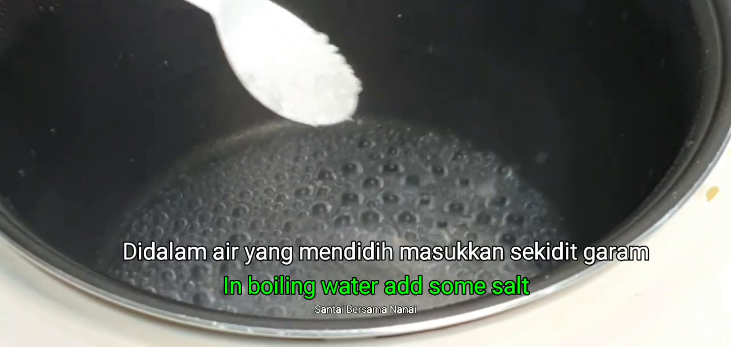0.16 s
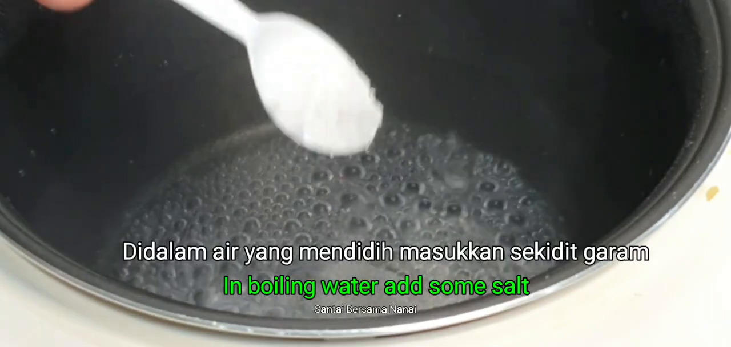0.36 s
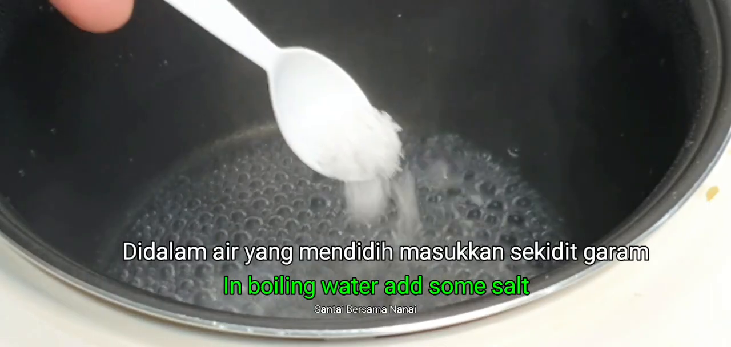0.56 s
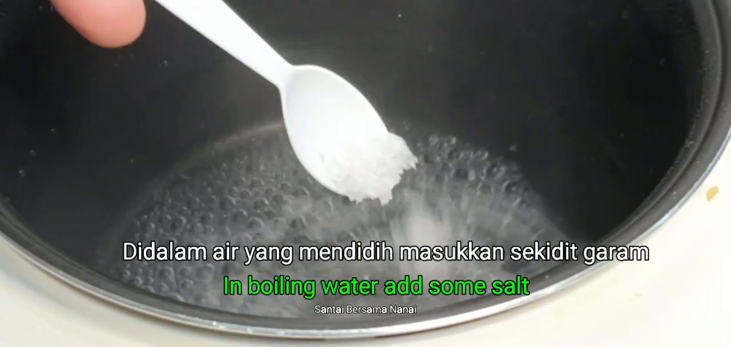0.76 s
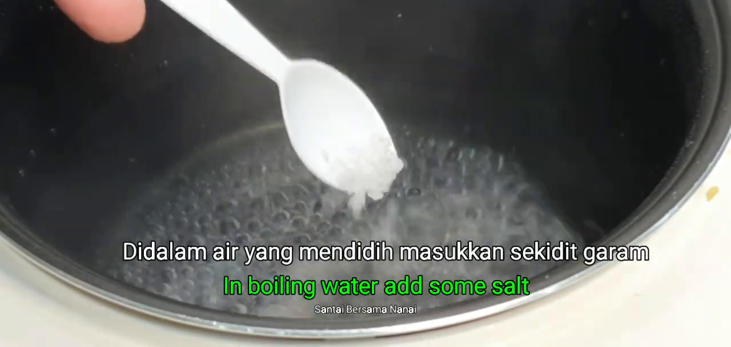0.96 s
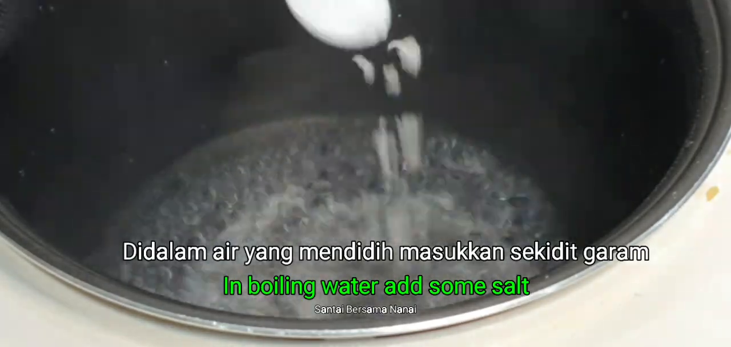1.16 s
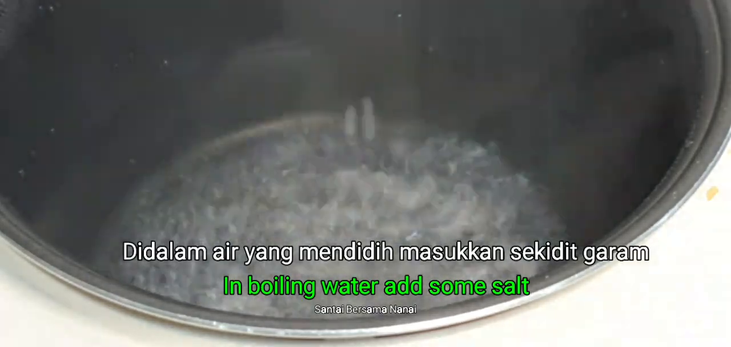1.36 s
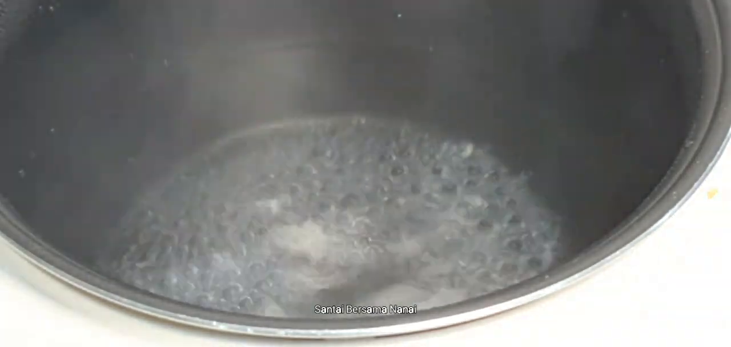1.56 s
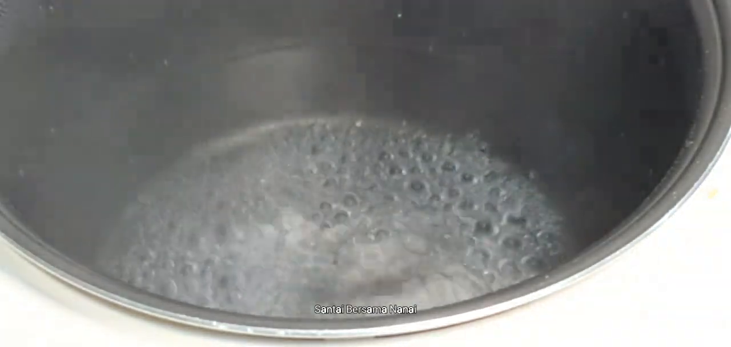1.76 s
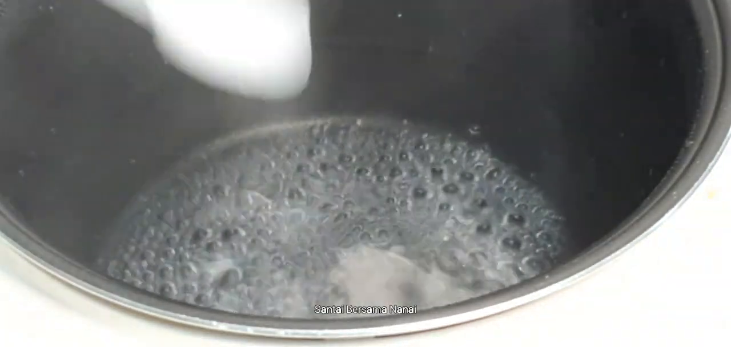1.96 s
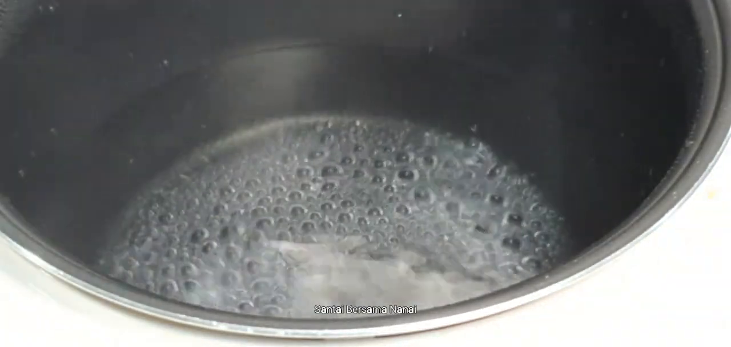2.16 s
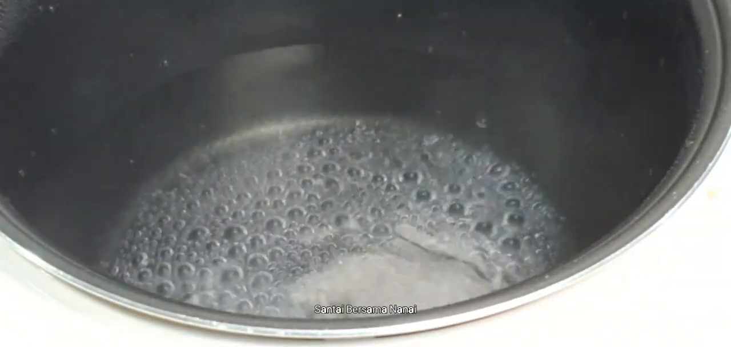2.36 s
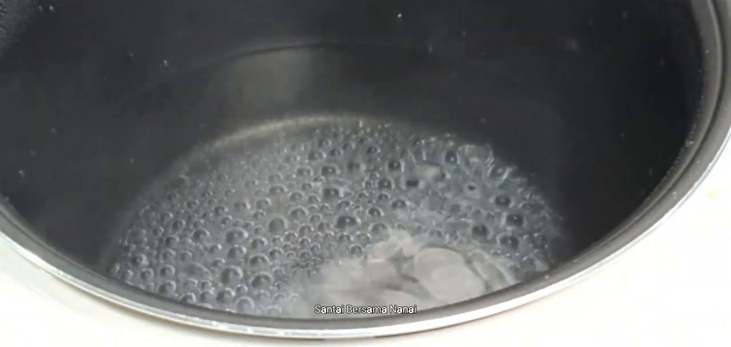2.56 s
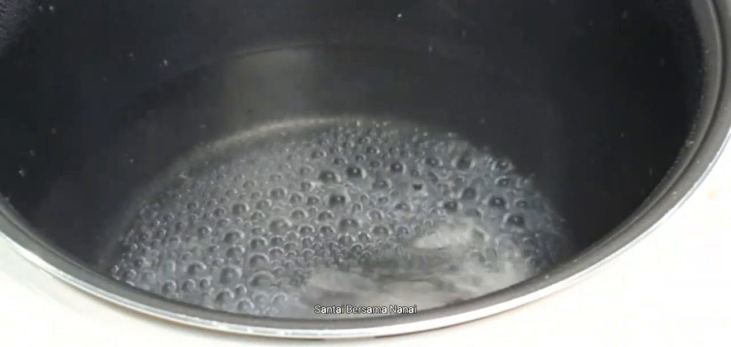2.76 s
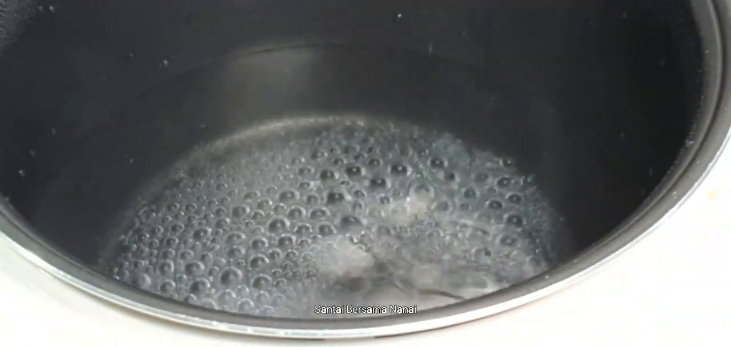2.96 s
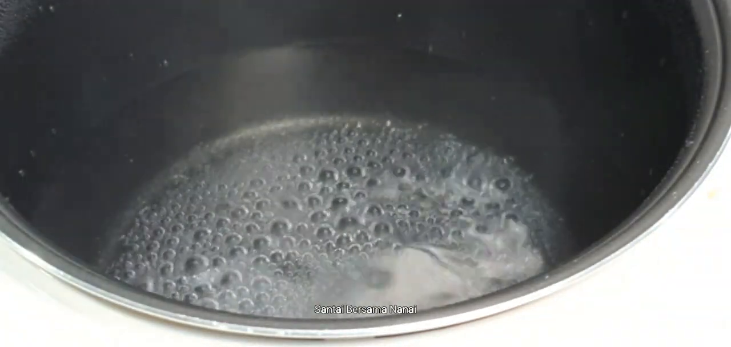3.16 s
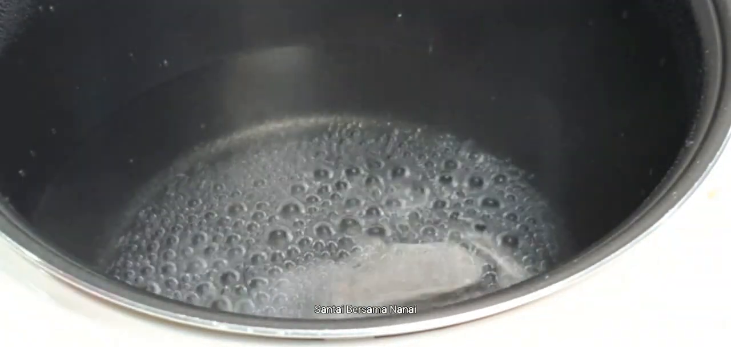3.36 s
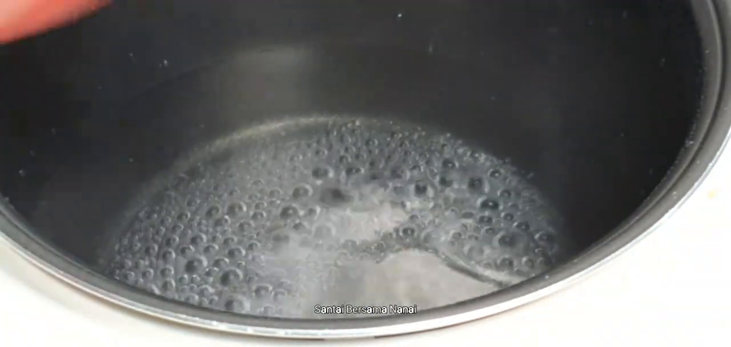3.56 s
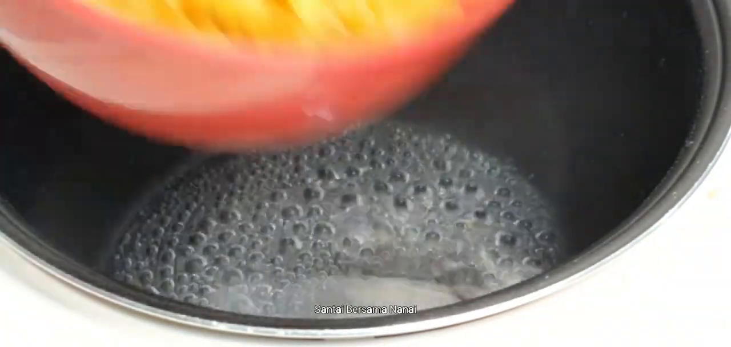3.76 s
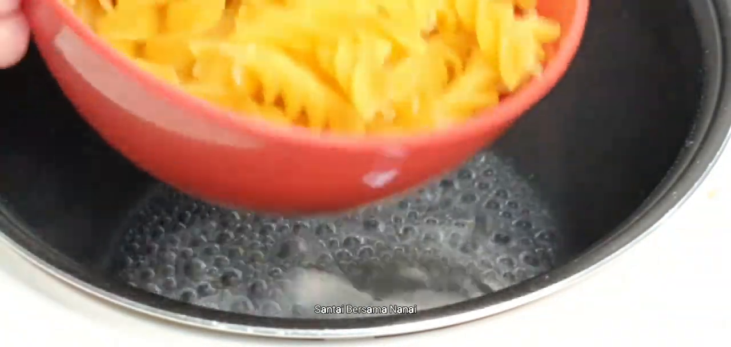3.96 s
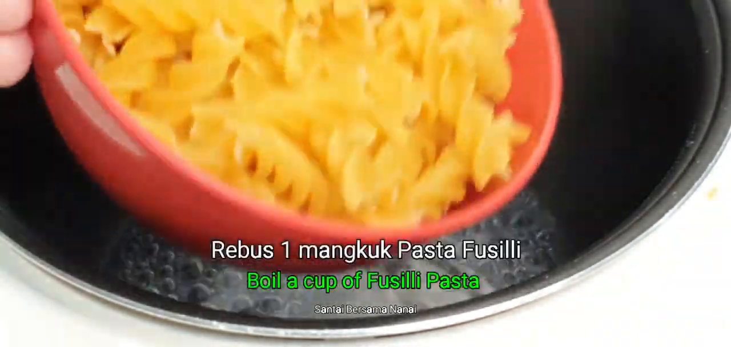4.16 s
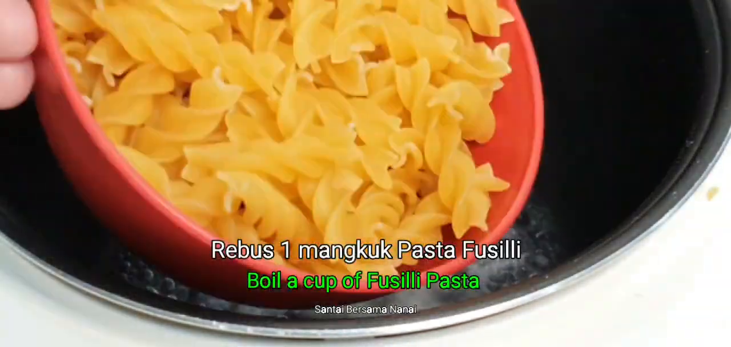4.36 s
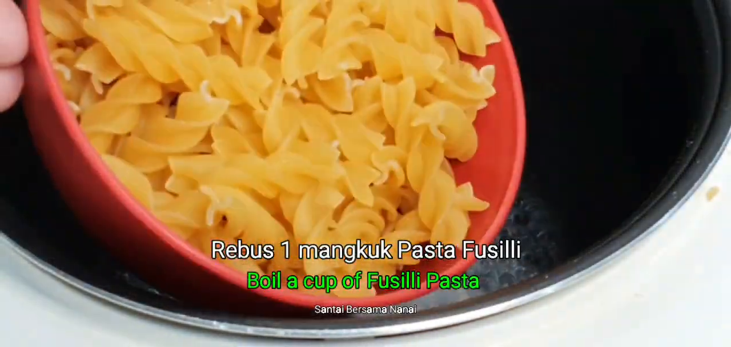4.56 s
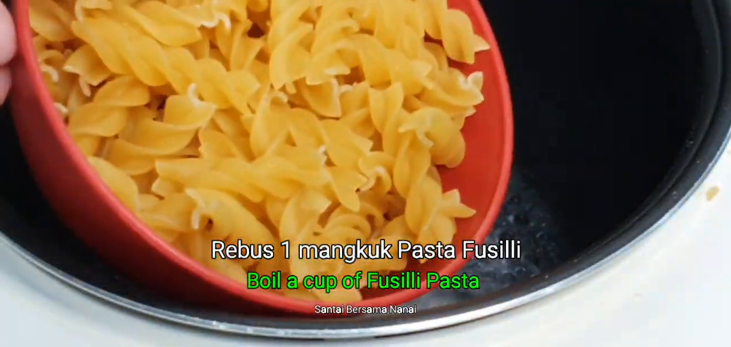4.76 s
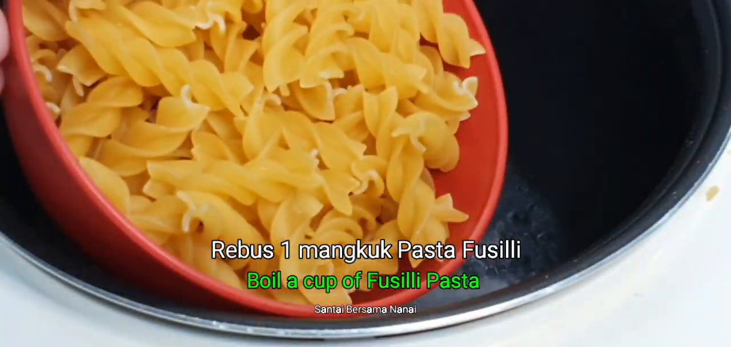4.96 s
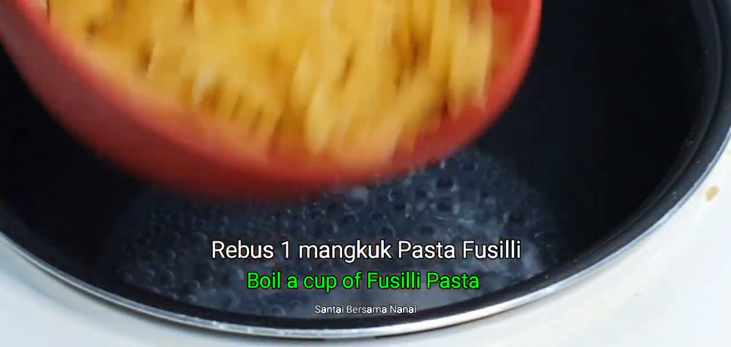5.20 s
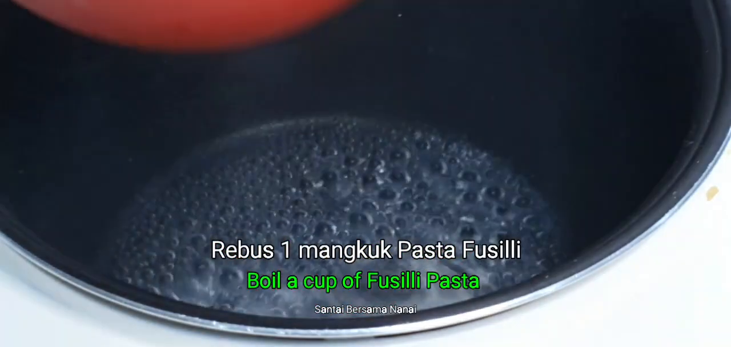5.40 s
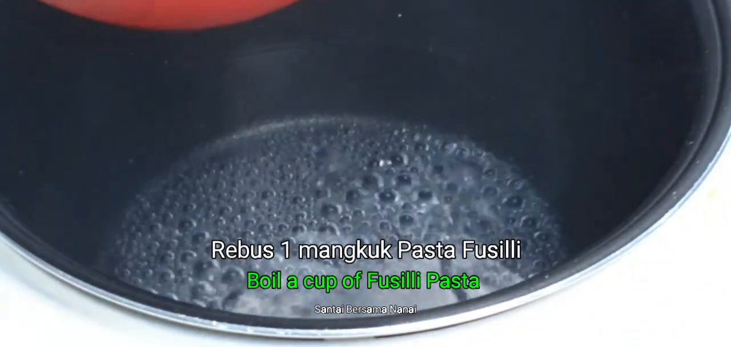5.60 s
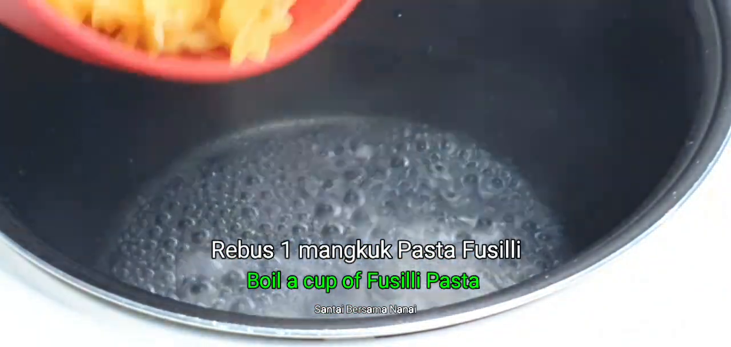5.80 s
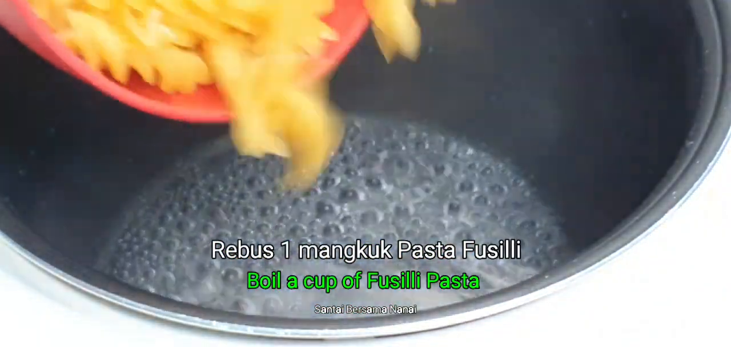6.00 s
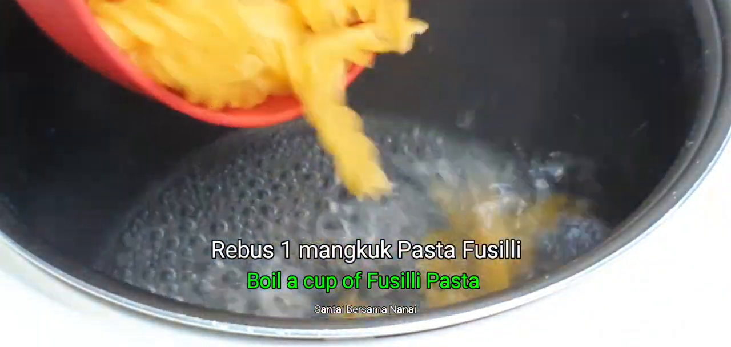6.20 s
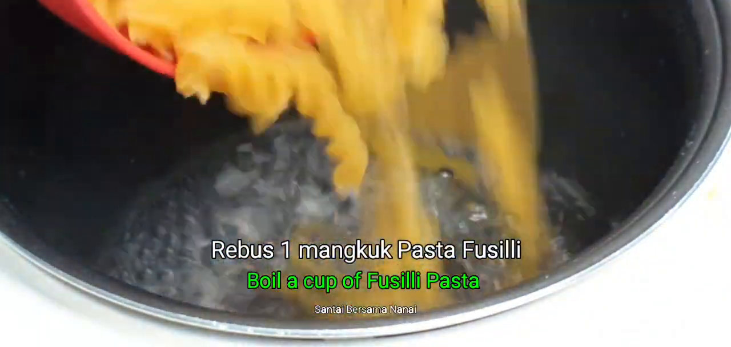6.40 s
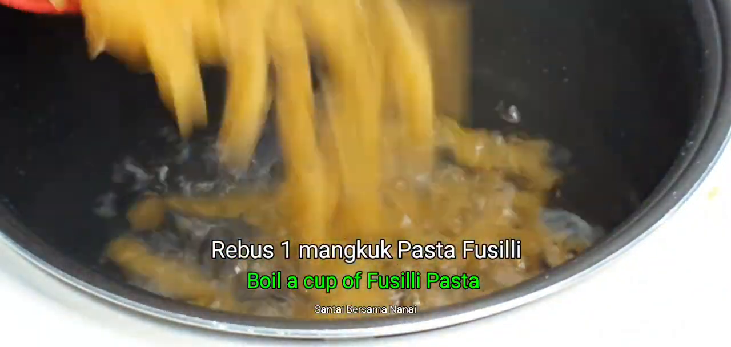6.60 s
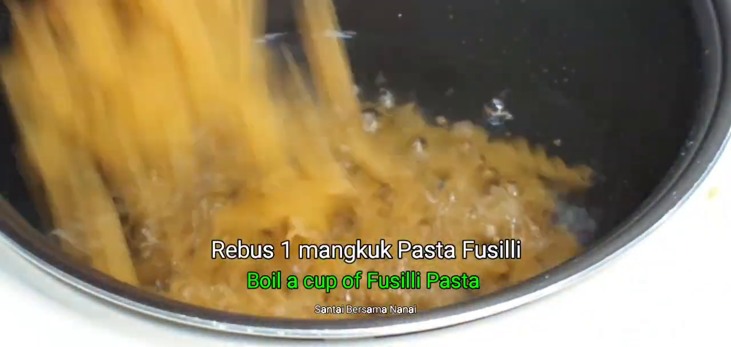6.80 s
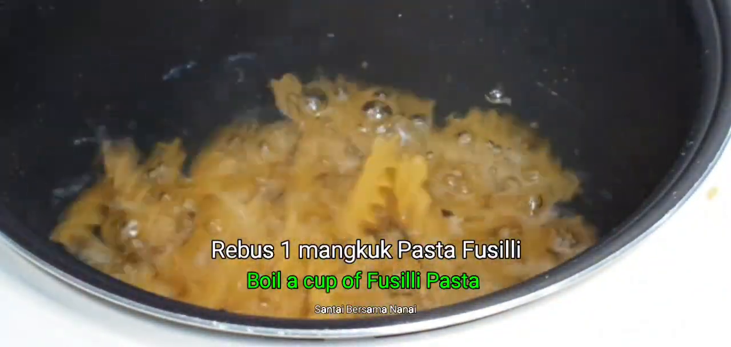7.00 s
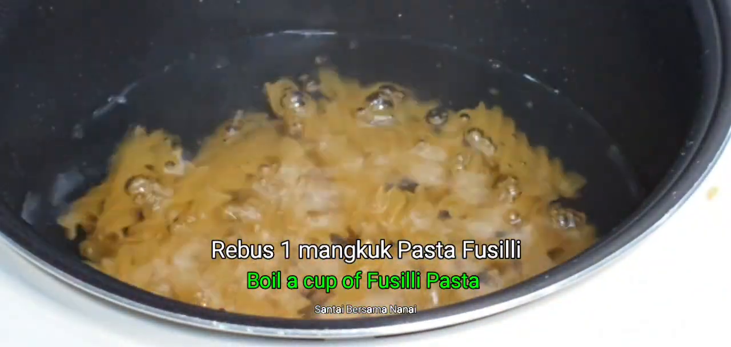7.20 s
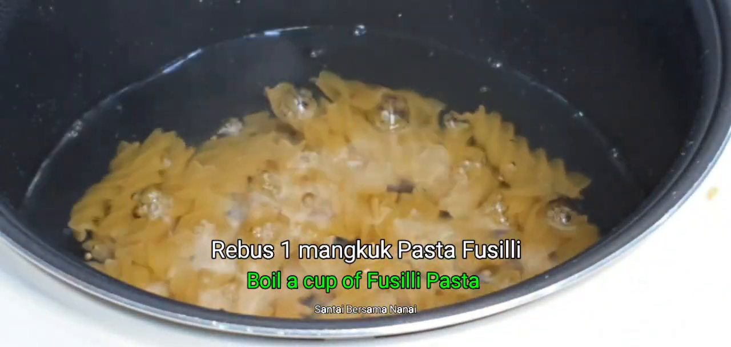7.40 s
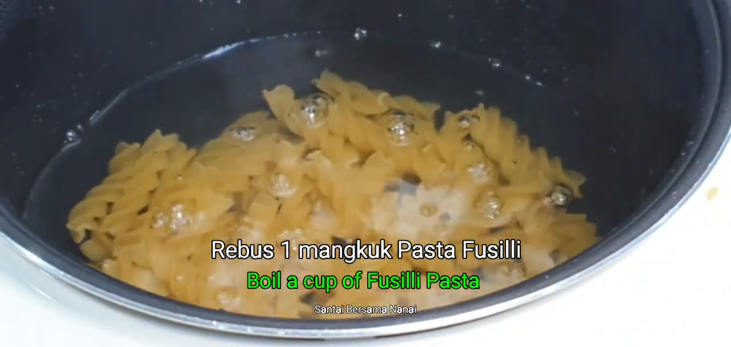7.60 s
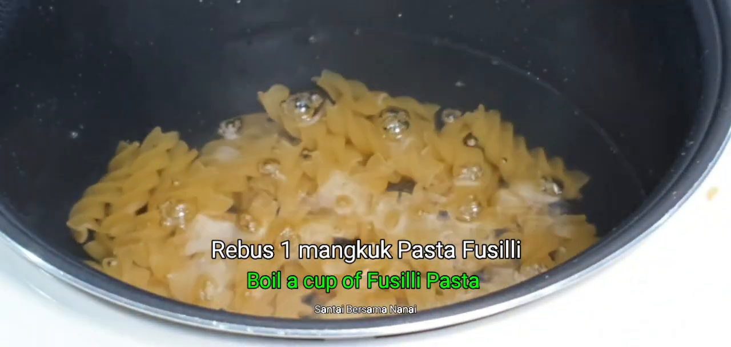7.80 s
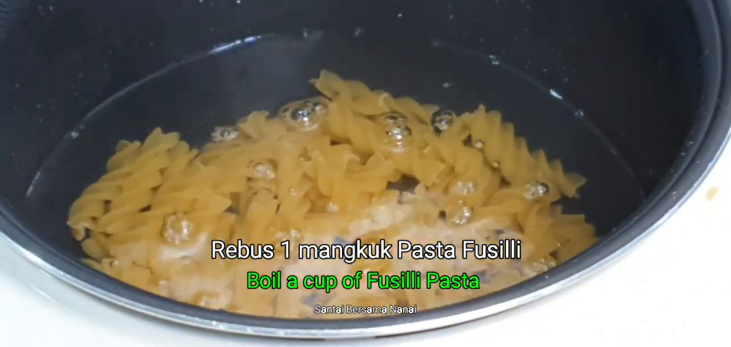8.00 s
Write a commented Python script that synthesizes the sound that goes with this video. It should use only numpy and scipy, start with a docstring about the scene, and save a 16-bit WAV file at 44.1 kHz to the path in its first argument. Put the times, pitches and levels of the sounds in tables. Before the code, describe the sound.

Over steady humming and airy wash, a few hard ticks sound before dry pasta rushes into water with metallic clatter, slaps and gulps.

```python
"""Dry pasta into a simmering pot

A fan and a mains hum drone in a small kitchen, as steady tones over the noise of moving air and simmer.
Faint high fizzes sound, pasta ticks and shifts in its bowl: bursts and swells of noise and impulses.
Then the pasta pours into the pot close by: hails of impulses scrape and slap, and swarms of decaying
sines clack, gulp and bubble. Pot echoes, ringing metal and a kitchen tail surround all but the background."""
import sys
import numpy as np
from scipy import signal
from scipy.fft import rfft, irfft
from scipy.io import wavfile
from scipy.ndimage import uniform_filter1d

SR = 44100
rng = np.random.default_rng(int(sys.argv[2]) if len(sys.argv) > 2 else 0)


def put_to_file(sound):
    """Save the sound as 16-bit audio at rate SR, in the file named by the first command-line argument."""
    columns = np.atleast_2d(sound).T  # one column per channel
    safe = np.clip(columns, -1, 1)
    whole_steps = np.round(safe * 32767)
    wavfile.write(sys.argv[1], SR, whole_steps.astype(np.int16))


N = 354953  # length in samples

# Tones of the fan. Each row: multiple of the shaft speed, level in dB relative to FAN_DB.
FAN_TONES = [(3, -3.5), (4, -1.5), (6, -15), (7, -7.5), (8, 0.5), (9, -9.5), (10, -2), (11, -6), (13, -7),
             (20, -31), (25, -12.5), (32, -11.5), (37, -22), (40, -8), (47, -6), (56, -11.5)]
# Overtones of the mains hum. Each row: multiple of the mains pitch, level in dB relative to the swell.
HUM_TONES = [(1, 0), (3, -20), (6, -25.5)]
# Swell of the hum. Each row: time in seconds, level in dB.
HUM_SWELL = [(0, -52.5), (1.0, -47.5), (3.7, -38.5), (5.4, -41.5), (6.8, -39), (8.05, -40.5)]
# Standing waves put the tones out of step between the ears.
# Each row: frequency in Hz, lag of the right ear in radians.
EAR_PHASE = [(120, 0.045), (200, 0.2), (300, 1.15), (440, 0.77), (650, 2.07), (1000, 2.64)]
# Low rumble of moving air. Each row: frequency in Hz, relative spectral level in dB per Hz.
RUMBLE_COLOUR = [(20, -6), (38, -15), (55, 2), (78, -4.5), (93, 11.5), (112, 3), (130, 2.5), (165, 0),
                 (215, -2.5), (270, -4.5), (350, -9), (450, -50)]
# Wash of air and simmer above it. Each row: frequency in Hz, relative spectral level in dB per Hz.
WASH_COLOUR = [(190, -15), (330, -5), (480, -6), (580, -2.5), (720, -3), (930, -8), (1150, -8.5),
               (1500, -14.5), (2400, -21.5), (2850, -22), (3170, -20.5), (3650, -25), (5000, -31.5),
               (8200, -37), (10200, -44), (11500, -64)]
# Likeness of the air noise at the two ears. Each row: frequency in Hz, correlation from -1 to 1.
AIR_LIKENESS = [(60, 0.88), (120, 1), (220, 0.76), (430, 0.084), (830, -0.29), (1610, -0.28), (3100, -0.1),
                (5990, -0.038), (11600, -0.067)]
# Stereo balance of the air noise. Each row: frequency in Hz, left minus right in dB.
AIR_BALANCE = [(60, 2.5), (140, -1), (200, 0), (300, 5), (450, 1), (2300, 1.5), (3300, 1.5), (5200, 1),
               (6500, 4), (8200, 5), (9300, 1.5)]
# Faint high fizzes, and the bright edge of the knocks at 2.79 and 3.0 seconds.
# Each row: start in seconds, level in dB before the pot, centre in Hz, decay time constant in ms.
FIZZES = [(0.939, -57.5, 10500, 39), (1.14, -49.5, 9800, 10), (1.56, -62, 9700, 71),
          (2.73, -55.5, 8100, 28), (2.79, -38.5, 8300, 2.1), (3.0, -45.5, 8200, 34), (3.176, -59, 7900, 25),
          (3.364, -58, 7500, 21), (7.61, -56, 6460, 12)]
# Loudest knocks of dry pasta on bowl, pot and water.
# Each row: start in seconds before the travel delay, level in dB before trims, centre in Hz.
KNOCKS = [(2.618, -40, 3780), (2.7887, -31, 3440), (2.9949, -19.5, 3700), (3.1324, -37.5, 5300),
          (3.1735, -33, 4110), (3.185, -35, 4070), (3.198, -37, 3800), (3.681, -37.5, 5000),
          (5.4969, -37, 5500), (5.525, -39.5, 2800), (5.5496, -34.5, 2800), (5.8551, -41.5, 3170),
          (6.124, -21, 5780), (6.1339, -22, 4980), (6.2292, -17.5, 5450), (6.2353, -16, 5400),
          (6.2679, -13.5, 5880), (6.286, -11, 5450), (6.2932, -9.5, 5850), (6.3865, -11.5, 2970),
          (6.4654, -18.5, 6180), (6.4923, -17, 6090), (6.557, -15, 5700), (6.918, -17, 4890),
          (6.9919, -12, 4860), (7.0718, -8.5, 5500), (7.223, -18.5, 2970), (7.2709, -21, 3510),
          (7.3073, -29, 3000), (7.3411, -22.5, 3300), (8.0292, -35, 3770)]
# Colour of a single knock. Each row: frequency in Hz, relative spectral level in dB per Hz.
KNOCK_COLOUR = [(300, -21.5), (800, -3.5), (1300, 0.5), (1900, -4.5), (2500, -0.5), (3700, 4), (4500, -1.5),
                (5600, 1.5), (6600, -5), (8300, -2), (9500, -8), (11500, -16.5)]
# Last pieces set the rim of the pot ringing.
# One row: start in seconds, level in dB before the pot, pitch in Hz, t60 in seconds.
RIM_RING = (7.212, -36.5, 2991, 0.28)
# Single pings: large bubbles and drops, and longer rings of pot and water.
# Each row: start in seconds, level in dB before the pot, starting pitch in Hz, t60 in seconds.
SINGLE_PINGS = [(3.168, -43, 1256, 0.13), (6.386, -17, 3170, 0.018), (6.404, -27.5, 2730, 0.087),
                (6.598, -23, 1320, 0.035), (6.672, -21, 1810, 0.021), (6.875, -10, 2035, 0.013),
                (6.8748, -19.5, 960, 0.028), (7.145, -24, 2477, 0.11)]
# Pieces shift as the bowl is moved.
# Each row: middle in seconds, level in dB before the pot, half-length in seconds.
SHIFTS = [(3.415, -70, 0.02), (4.22, -70.5, 0.13), (5.513, -61, 0.035), (5.98, -70, 0.18)]
# How fast the pasta leaves the tilting bowl. Each row: time in seconds, flow in dB.
FLOW = [(6.12, -15), (6.23, -4.5), (6.35, -7.5), (6.58, -1), (6.76, -1.5), (7.04, 2), (7.17, -1.5),
        (7.275, -8), (7.42, -37)]
# Clumps that break loose and land together. Each row: start in seconds, clatter level in dB before trims.
CLUMPS = [(6.226, -36.5), (6.283, -43), (6.397, -39), (6.553, -33.5), (6.797, -29), (6.915, -26),
          (6.99, -26), (7.144, -26.5)]
# Colour of the clatter. Each row: frequency in Hz, relative spectral level in dB per Hz.
CLATTER_COLOUR = [(900, -41), (2000, -10.5), (3200, -5), (3800, 1.5), (4350, -3), (4850, 1), (5300, -4.5),
                  (5900, 1.5), (6500, -5), (8200, -3), (9200, -9.5), (10500, -9.5), (11500, -20.5)]
# Colour of the splash. Each row: frequency in Hz, relative spectral level in dB per Hz.
SPLASH_COLOUR = [(300, -25), (480, -9), (680, -1.5), (850, -0.5), (1020, -10), (1200, 1), (1400, -8),
                 (1600, 3), (1800, -13.5), (2300, 0), (4000, -14), (9000, -50)]
# Ringing metal of the pot. Each row: pitch in Hz, level in dB relative to the direct sound, t60 in seconds.
POT_MODES = [(1165, -27.5, 0.32), (2380, -21.5, 0.17), (2530, -19.5, 0.046), (2937, -22, 0.2),
             (3804, -24, 0.18), (4820, -20, 0.15), (4984, -24.5, 0.13), (5500, -19, 0.11),
             (6170, -21.5, 0.13)]
# Stereo balance of everything at the pot. Each row: frequency in Hz, left minus right in dB.
POT_BALANCE = [(400, -3), (750, 11), (1200, 4), (1700, 7), (2100, 1), (2450, 6), (3000, -2.5), (4400, -1),
               (5000, 0), (5700, 8.5), (6600, 3.5), (8200, 5.5), (9000, 0), (11000, 1)]
# Tail of the kitchen. Each row: frequency in Hz, t60 in seconds.
KITCHEN_T60 = [(200, 0.23), (1500, 0.3), (5000, 0.39), (11000, 0.43)]

TIME = np.arange(N) / SR  # seconds
SHAFT_HZ, FAN_DB = 17.5, -51.5
MAINS_HZ = 100.07
RUMBLE_DB, WASH_DB = -46.5, -51.5
KNOCK_DECAY_MS = 1.42
# Pour layers, before trims: level at a flow of 0 dB, and dB gained per dB of flow.
CLATTER_DB, CLATTER_SLOPE = -33, 1.67
SPLASH_DB, SPLASH_SLOPE = -39, 1.29
BUBBLES_DB, BUBBLES_SLOPE = -33, 1.32
BUBBLES_LAG_S = 0.028  # air is dragged under a moment after the pieces land
CLUMP_RISE_S, CLUMP_FALL_S = 0.003, 0.036
CLUMP_SPLASH_DB = -10.5  # splash of a clump relative to its clatter
EDGE_HZ = 11500  # cutoff of the closing low-pass


def gain_of(db):
    """Decibels to amplitude."""
    return 10 ** (np.asarray(db) / 20)


def evened(x):
    """Scale to unit rms."""
    return x / np.sqrt(np.mean(x ** 2) + 1e-20)


def read(points, hz):
    """Read a table along a log-frequency axis."""
    f, value = np.transpose(points)
    return np.interp(np.log(hz + 1), np.log(f + 1), value)


def add(mix, s, sound):
    """Mix a sound in at time s."""
    part = mix[max(round(s * SR), 0):][:len(sound)]
    part += sound[:len(part)]


def colour(x, points, size=2048):
    """Minimum-phase filter with the given spectrum: it rings only forwards, so attacks stay sharp."""
    level_db = read(points, np.fft.rfftfreq(size, 1 / SR))
    cepstrum = irfft(np.log(gain_of(level_db)))
    # Fold the cepstrum forwards to make the filter causal.
    cepstrum[1:size // 2] *= 2
    cepstrum[size // 2 + 1:] = 0
    response = irfft(np.exp(rfft(cepstrum)))
    return signal.oaconvolve(x, response)[:len(x)]


def drift(hz):
    """Slow random wander: unit-size random knots, hz of them a second, joined by straight lines."""
    knots = rng.standard_normal(int(N / SR * hz) + 2)
    return np.interp(TIME * hz, np.arange(len(knots)), knots)


def tone(hz, wander):
    """A steady sine at both ears, whose phase wanders by about that many radians."""
    phase = 2 * np.pi * (hz * TIME + rng.random()) + wander * drift(1.96)
    return np.sqrt(2) * np.sin([phase, phase - read(EAR_PHASE, hz)])


def drone():
    """Fan tones and mains hum; the fan's sixth order beats against the hum about five times a second."""
    fan = sum(gain_of(FAN_DB + db) * tone(k * SHAFT_HZ, wander=0.12) for k, db in FAN_TONES)
    hum = sum(gain_of(db) * tone(k * MAINS_HZ, wander=0.06) for k, db in HUM_TONES)
    swell = gain_of(np.interp(TIME, *np.transpose(HUM_SWELL)))
    lean = gain_of([[.35], [-.35]])  # a touch to the left
    return (fan + hum * swell) * lean


def air(spectrum, level_db, flutter_db):
    """Noise with a gently fluttering level, alike in both ears in the bass and diffuse above."""
    hz = np.fft.rfftfreq(N, 1 / SR)
    left, other = rfft(rng.standard_normal((2, N)))
    same = np.clip(read(AIR_LIKENESS, hz), -1, 1)
    right = same * left + np.sqrt(1 - same ** 2) * other
    ear_db = read(spectrum, hz) + np.outer([.5, -.5], read(AIR_BALANCE, hz))
    pair = irfft(np.array([left, right]) * gain_of(ear_db), N)
    return pair / np.std(pair.mean(0)) * gain_of(level_db + flutter_db * drift(14))


def burst(level_db, hz, decay_ms, focus_db, snap=4.7):
    """One sharp first contact and a dying spray of tiny ones, focused around hz."""
    t = np.arange(8192) / SR
    envelope = np.exp(-1000 * t / max(decay_ms, .2))
    spray = rng.standard_normal(len(t)) * envelope
    spray[0] = snap
    focus = [(hz / 2, -focus_db), (hz, 0), (hz * 2, -focus_db)]
    spray = colour(colour(spray, KNOCK_COLOUR), focus)
    # Same energy as the envelope, then halved in amplitude.
    return gain_of(level_db) * spray / np.linalg.norm(spray) * np.linalg.norm(envelope) / 2


def ping(hz, t60, rise):
    """A dying sine whose pitch climbs by twice the share rise over t60, as a bubble's does near the surface."""
    t = np.arange(int(t60 * SR)) / SR
    wave = np.sin(2 * np.pi * hz * t * (1 + rise * t / t60))
    decay = np.exp(-np.log(1000) * t / t60)
    attack = 1 - np.exp(-t * hz)
    return wave * decay * attack


def ticks(knock_db=1.5, travel_s=0.001011):
    """Short bursts for knocks of pasta, high ones for fizzes and bright edges, a dying sine for the rim."""
    out = np.zeros(N)
    for s, *fizz in FIZZES:
        add(out, s, burst(*fizz, focus_db=18.0))
    for s, *knock in KNOCKS:
        add(out, s + travel_s, gain_of(knock_db) * burst(*knock, KNOCK_DECAY_MS, focus_db=5.5))
    s, db, hz, t60 = RIM_RING
    add(out, s, gain_of(db) * ping(hz, t60, rise=0))
    return out


def swarm(centre_hz, spread, cycles, range_db, rise, count):
    """Pings of random pitch, size and life strewn over the pour, at unit level."""
    out, start, end = np.zeros(N), FLOW[0][0], FLOW[-1][0]
    chances = rng.random((count, 3))
    pitches = np.clip(rng.standard_normal(count), -2, 2)
    for (when, size, life), pitch in zip(chances, pitches):
        hz = centre_hz * np.exp(spread * pitch)
        t60 = (1 + life) * cycles / hz
        add(out, start + when * (end - start), gain_of(-range_db * size) * ping(hz, t60, rise))
    return out / np.std(out[int(start * SR):int(end * SR)])


def flow(level_db, slope, lag_s=0):
    """Amplitude of a layer that follows the flow of pasta; inaudible before and after."""
    flow_db = np.interp(TIME - lag_s, *np.transpose(FLOW), left=-120, right=-120)
    return gain_of(level_db + slope * flow_db)


def bubbles(swarm_db=-3):
    """Air dragged under by the pasta rings as a swarm of small bubbles, with single pings of pot and water."""
    small = swarm(centre_hz=2478, spread=0.144, cycles=37, range_db=9, rise=0.047, count=600)
    out = gain_of(swarm_db) * flow(BUBBLES_DB, BUBBLES_SLOPE, BUBBLES_LAG_S) * small
    for s, db, hz, t60 in SINGLE_PINGS:
        add(out, s, gain_of(db) * ping(hz, t60, rise=0.014))
    return out


def impacts(per_s, spread_db):
    """A random hail of impulses, a few much larger than the rest, evened out over about 50 ms."""
    size = gain_of(spread_db * np.minimum(rng.exponential(1, N), 3.5))
    hail = size * rng.choice([-1, 1], N) * (rng.random(N) < per_s / SR)
    return hail / np.sqrt(abs(uniform_filter1d(hail ** 2, size=2200)) + 1e-4)


def settling():
    """A few pieces shift softly in the bowl before they fall: hails of impulses in short swells."""
    swells = sum(gain_of(db) * np.exp(-((TIME - s) / half_s) ** 2) for s, db, half_s in SHIFTS)
    return swells * evened(colour(impacts(per_s=280, spread_db=3.0), KNOCK_COLOUR))


def clumps():
    """Each clump lands in a quick surge that dies away."""
    out = np.zeros(N)
    for s, db in CLUMPS:
        age = np.maximum(TIME - s, 0)
        out += gain_of(db) * np.minimum(age / CLUMP_RISE_S, 1) * np.exp(-age / CLUMP_FALL_S)
    return out


def clatter(scrape_db=-1.0, clack_db=-10):
    """Hard little pieces scrape over each other; those that collide clack, each at its own pitch."""
    scrapes = evened(colour(impacts(per_s=1200, spread_db=3.5), CLATTER_COLOUR))
    clacks = swarm(centre_hz=5300, spread=0.347, cycles=12, range_db=17, rise=0, count=300)
    pour = np.hypot(flow(CLATTER_DB, CLATTER_SLOPE), clumps())
    return pour * (gain_of(scrape_db) * scrapes + gain_of(clack_db) * clacks)


def splash(slap_db=-1, gulp_db=-10):
    """The pieces slap the water, which closes over them in short gulps of rising pitch."""
    slaps = evened(colour(impacts(per_s=900, spread_db=3.5), SPLASH_COLOUR))
    gulps = swarm(centre_hz=1150, spread=0.324, cycles=15, range_db=9, rise=0.11, count=200)
    landing = np.hypot(flow(SPLASH_DB, SPLASH_SLOPE), gain_of(CLUMP_SPLASH_DB) * clumps())
    return landing * (gain_of(slap_db) * slaps + gain_of(gulp_db) * gulps)


def pot(lag, wall_db, wall_decay=0.0046):
    """Response from one spot: direct sound, quick echoes between the walls, and the ring of the metal."""
    t = np.arange(SR // 2) / SR
    response = np.zeros((2, len(t)))
    response[0, 0] = response[1, lag] = 1  # the left ear is a little nearer; lag in samples
    walls = rng.standard_normal(response.shape) * np.exp(-t / wall_decay) * (t > .0003)
    response += gain_of(wall_db) * walls / np.linalg.norm(walls[0])
    for hz, db, t60 in POT_MODES:
        wave = np.cos(2 * np.pi * (hz * t + rng.random((2, 1))))
        ring = wave * np.exp(-np.log(1000) * t / t60)
        response += gain_of(db) * ring / np.linalg.norm(ring[0])
    return response / np.linalg.norm(response[0])


def kitchen():
    """A diffuse tail from hard walls: sparse random echoes, each band dying at its own speed."""
    taps = rng.standard_normal((2, SR // 2)) * (rng.random((2, SR // 2)) < .1)
    taps[:, :round(.006 * SR)] = 0  # gap before the first echo
    hz, t, bands = signal.stft(taps, SR, nperseg=256)
    decay = np.exp(-np.log(1000) * t / read(KITCHEN_T60, hz)[:, None])
    tail = signal.istft(bands * decay, SR, nperseg=256)[1]
    return tail[:, :SR // 2] / np.linalg.norm(tail[0])


def scatter(x, wall_db, wet_db, count=8, size=300):
    """Contacts hop between spots in the pot every size samples or so, each spot with its own echoes."""
    spot = np.repeat(rng.integers(0, count, N // size + 1), size)[:N]
    out = np.zeros((2, N))
    for k in range(count):
        share = uniform_filter1d(1. * (spot == k), size=size // 4)  # soft crossfades
        response = pot(4 + k % 5, wall_db) + gain_of(wet_db) * kitchen()
        out += signal.oaconvolve((x * share)[None], response, axes=1)[:, :N]
    return out


def scene():
    """Everything at the pot rings through it and the room, over the drone and the air."""
    knocks = scatter(ticks(), wall_db=0.5, wet_db=-6.5, count=5, size=2400)
    water = scatter(bubbles(), wall_db=-2, wet_db=-12.0, count=4, size=1800)
    rush = scatter(clatter() + splash() + settling(), wall_db=-2.5, wet_db=-7.5)
    left, right = gain_of(2.0) * rush + gain_of(2.0) * knocks + gain_of(-2.0) * water
    left = colour(left, [(hz, .5 * db) for hz, db in POT_BALANCE])
    right = colour(right, [(hz, -.5 * db) for hz, db in POT_BALANCE])
    rumble = air(RUMBLE_COLOUR, RUMBLE_DB, flutter_db=2.5)
    wash = air(WASH_COLOUR, WASH_DB, flutter_db=0.72)
    return np.array([left, right]) + drone() + rumble + wash


def record(dry):
    """A steep low-pass closes off the top end."""
    low_pass = signal.firwin(301, EDGE_HZ, window=("kaiser", 9), fs=SR)
    return signal.oaconvolve(dry, low_pass[None], "same")


dry = scene()
out = record(dry)
put_to_file(out)
```